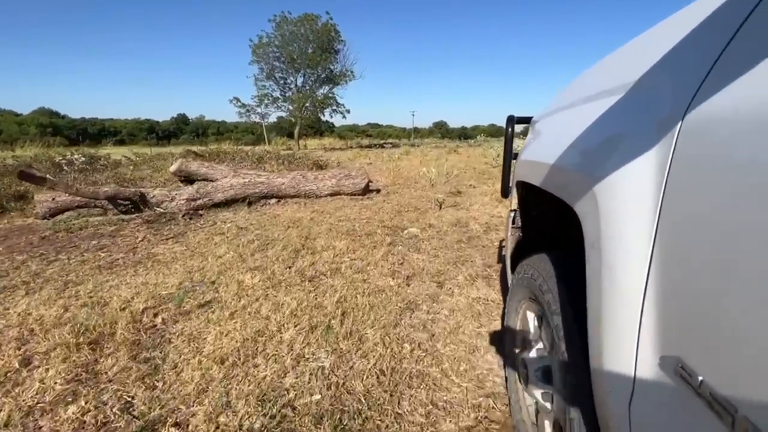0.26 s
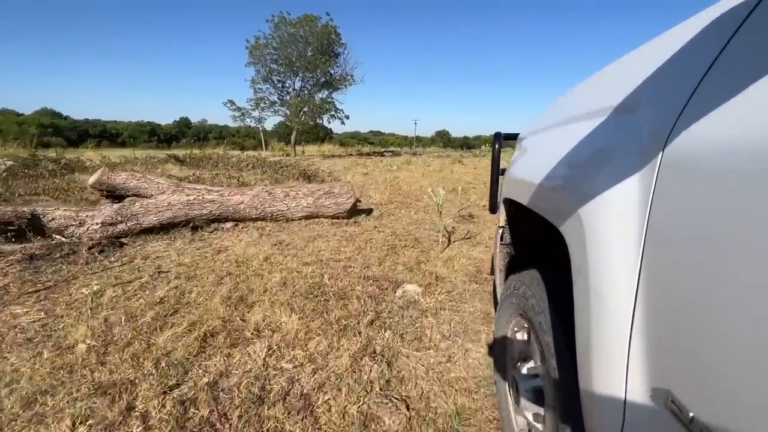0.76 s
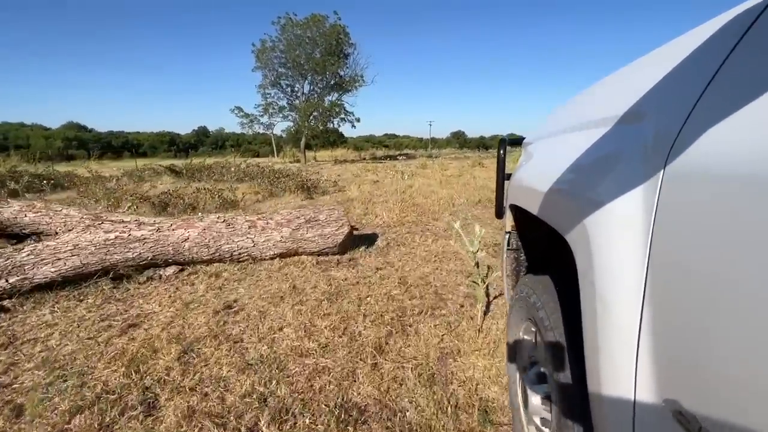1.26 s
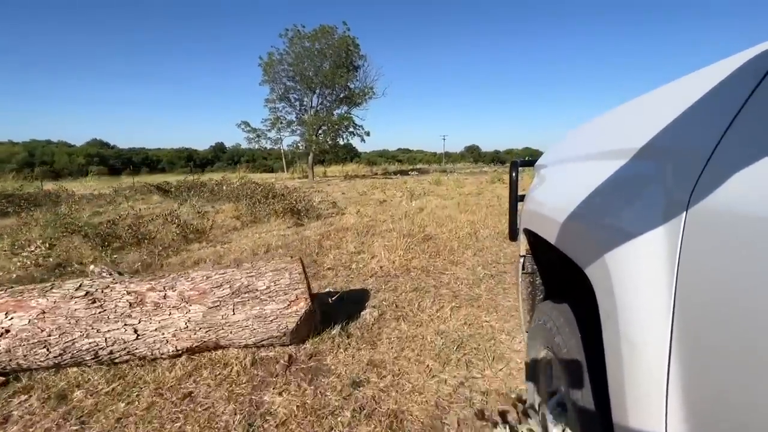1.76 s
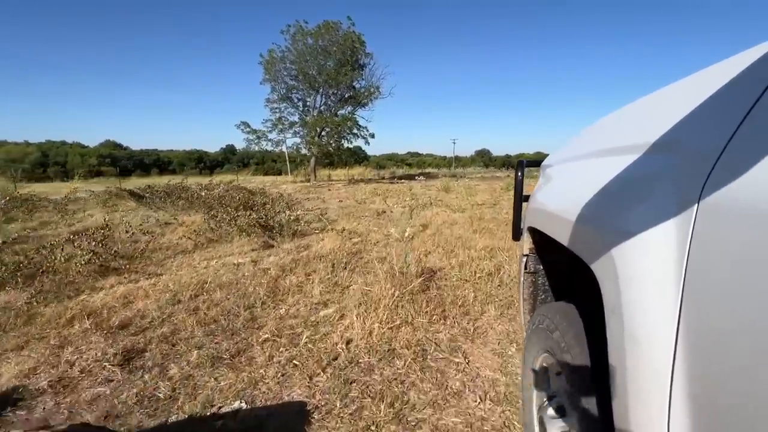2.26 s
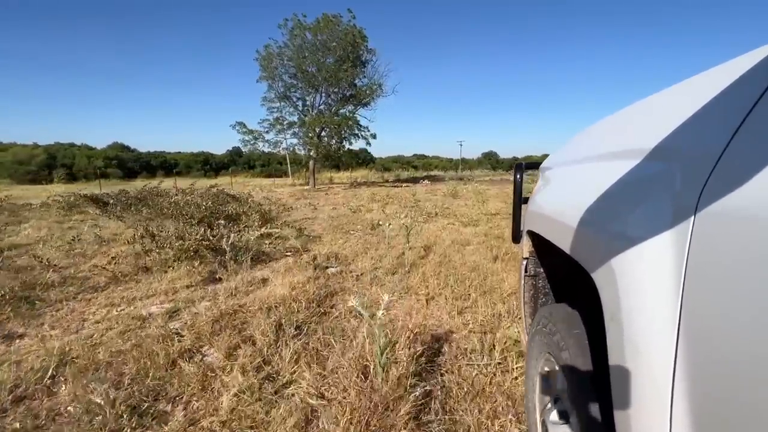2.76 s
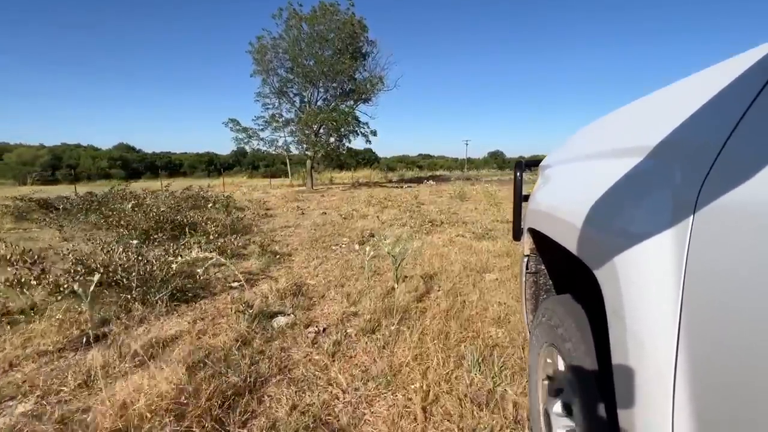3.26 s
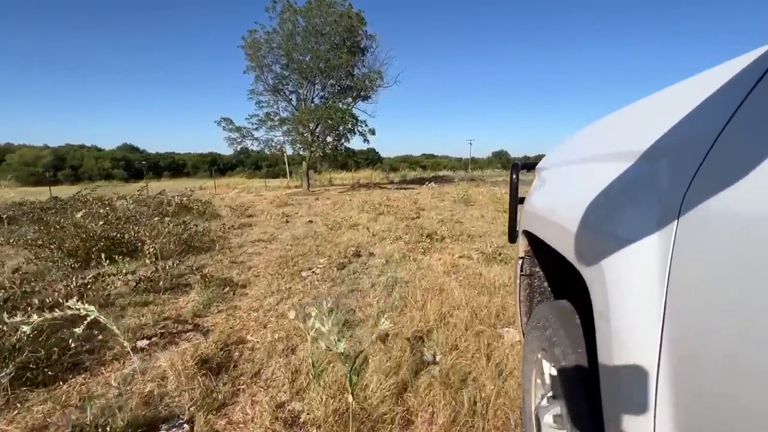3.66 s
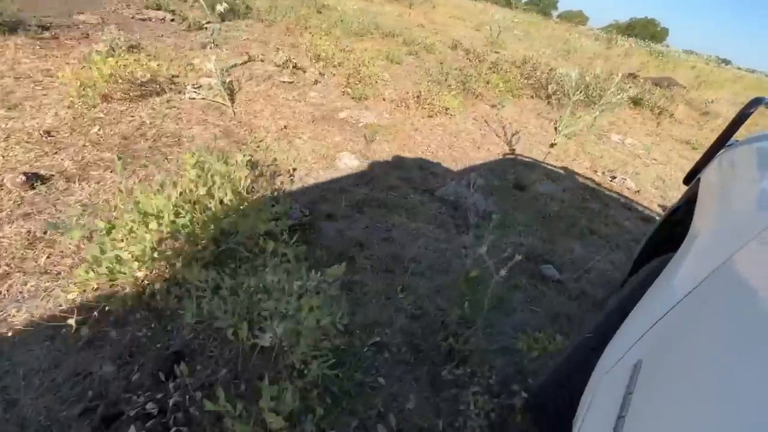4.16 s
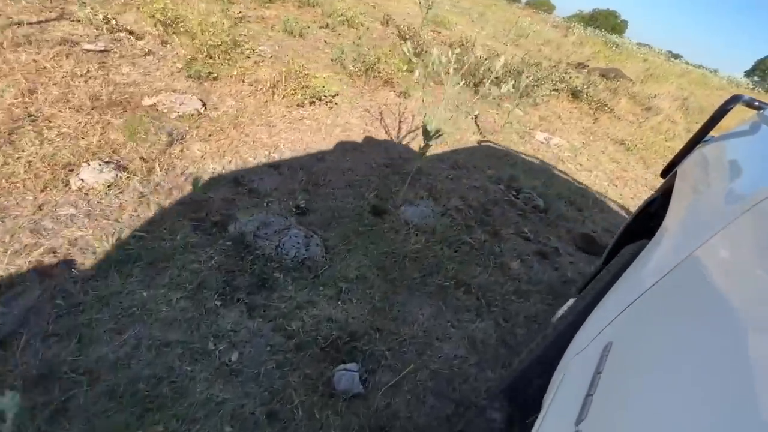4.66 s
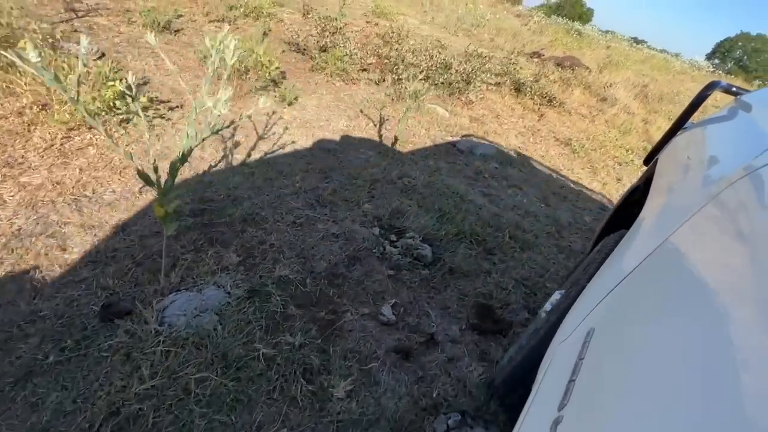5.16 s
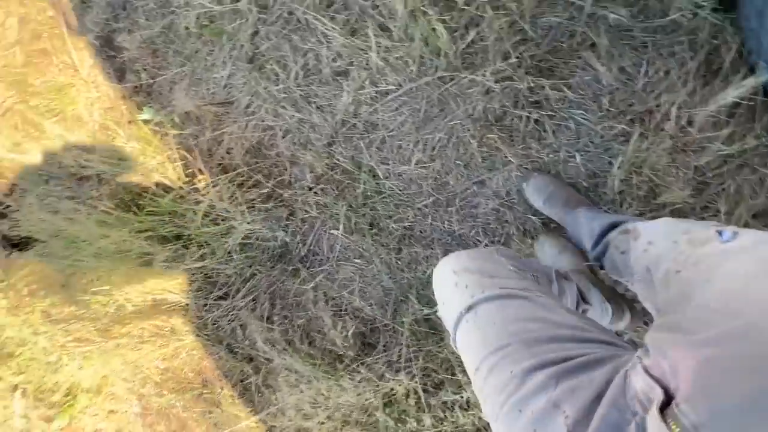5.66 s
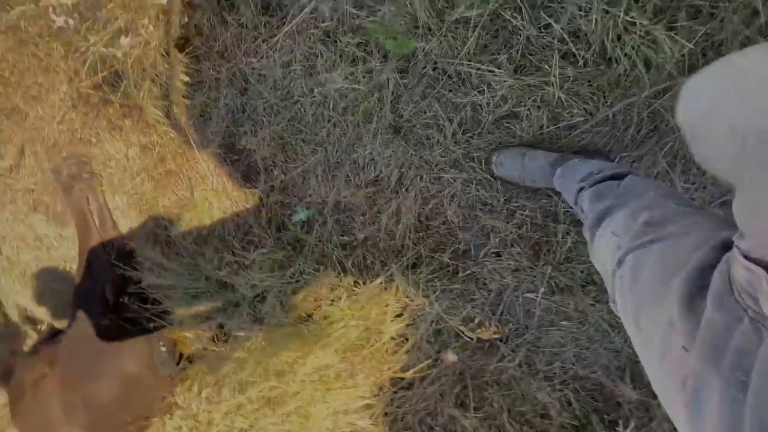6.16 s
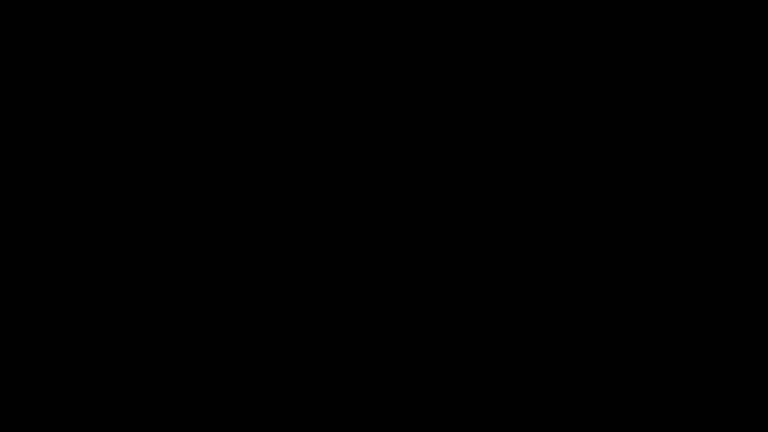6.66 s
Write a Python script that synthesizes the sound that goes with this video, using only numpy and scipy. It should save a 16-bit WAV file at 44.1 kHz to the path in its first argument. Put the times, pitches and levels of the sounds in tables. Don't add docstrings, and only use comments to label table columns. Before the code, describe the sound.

From the open window of a pickup rolling over dry pasture, a low eight-cylinder throb sits under a steady, coarse rush of grass crushed by tyres. Grasshoppers rattle in quick bright ticks during the first half second and again around 1.0-1.2. Stalks slap and pebbles ping the body at 1.6-1.9, with dull knocks at 2.0 and 2.2. The engine sags near 2.4; a stem scrapes raspily along sheet metal at 3.0-3.2 amid brittle hiss. The engine pulls up strongly at 3.7-4.3, with a low knock and whip at 3.85, then slows, lugging in soft booms from 4.9 to 5.3. At 5.4 the sound cuts abruptly to a much quieter place: boots swish in grass and thud softly, twigs snap at 5.65, 5.8 and 6.4-6.8, insects tick, and a distant engine idles faintly. Everything fades from about 6.4 to silence by 6.9.

```python
import sys
import numpy as np
from scipy import signal
from scipy.fft import rfft, irfft, next_fast_len
from scipy.io import wavfile
from scipy.ndimage import uniform_filter1d

SR = 44100
rng = np.random.default_rng(int(sys.argv[2]) if len(sys.argv) > 2 else 0)


def output_pcm(signal):
    pcm = np.clip(np.atleast_2d(signal).T, -1, 1) * 32767
    wavfile.write(sys.argv[1], SR, np.round(pcm).astype(np.int16))


def level_to_linear(level):
    exponent = np.asarray(level, float) / 20
    return 10 ** exponent


N = 304731
CUT_S, CUT_LENGTH_S = 5.397, 0.008
FADE_END_S, FADE_S = 6.935, 0.55


def in_time(rows):
    s, *columns = np.transpose(rows)
    return np.array([np.interp(np.arange(N) / SR, s, c) for c in columns])


def at_hz(table, column, hz):
    return np.interp(np.log(hz + 1), np.log(np.array(table)[:, 0]), np.array(table)[:, column])


def rms_one(x):
    return x / np.sqrt(np.mean(x ** 2) + 1e-20)


def drift(rate_hz):
    r = np.exp(-80 * np.pi * rate_hz / SR)
    slow = signal.lfilter([1], [1, -2 * r, r * r], rng.standard_normal(N // 40 + 2002))[2000:]
    return np.interp(np.arange(N) / 40, np.arange(len(slow)), rms_one(slow))


def ring(x, hz, width_hz):
    r = np.exp(-np.pi * width_hz / SR)
    top_one = np.array([1, 0, -1]) * (1 - r * r) / 2
    return signal.lfilter(top_one, [1, -2 * r * np.cos(2 * np.pi * hz / SR), r * r], x + 1e-18)


def add(out, s, piece):
    i = round(s * SR)
    out[..., i:i + piece.shape[-1]] += piece[..., :N - i]


def struck(rows, attack_s):
    out, t = np.zeros(N), np.arange(SR // 4) / SR
    for s, db, hz, t60 in rows:
        rise = np.minimum(t / min(attack_s, t60 / 10), 1)
        add(out, s, level_to_linear(db - 60 * t / t60) * rise * np.sin(2 * np.pi * hz * t))
    return out


# pitch_hz, width_hz, left_db, right_db
CASE_HOLLOWS = [(7590, 250, -13.5, -11.5), (5350, 91, -9.5, -14), (5780, 520, 2, -4.5),
                (8370, 520, 8.5, -3.5), (9230, 1060, -3, 3.5)]
# from_hz, to_hz, sign (-1 opposite, 1 same)
LOCKED_RANGES = [(10530, 11234, -1), (12340, 14860, 0.94)]
TOP_HZ, TOP_LEAD_S, TOP_LIKENESS = 10130, 0.0001873, 0.78


def pair(x, field):
    size = next_fast_len(N + 4096)
    hz, (one, other) = np.arange(size // 2 + 1) * SR / size, rfft(x, size)
    top = hz > TOP_HZ
    alike = np.clip(np.where(top, TOP_LIKENESS, at_hz(field, 3, hz)), 0, 1)
    lead = np.where(top, np.pi + 2 * np.pi * hz * TOP_LEAD_S, at_hz(field, 4, hz))
    tilt_db = at_hz(field, 2, hz) * ~top / 2 * [[1], [-1]]
    for centre_hz, width_hz, *gain_db in CASE_HOLLOWS:
        tilt_db += np.outer(gain_db, np.exp(-((hz - centre_hz) / width_hz) ** 2))
    left_gain, right_gain = level_to_linear(tilt_db)
    right = right_gain * (alike * np.exp(1j * lead) * one + np.sqrt(1 - alike ** 2) * other)
    for low_hz, high_hz, sign in LOCKED_RANGES:
        right = np.where((hz > low_hz) & (hz < high_hz), sign * left_gain * one, right)
    return irfft([left_gain * one, right], size)[:, :N]


# start_s, end_s, wing_beat_s, level_db
FLIGHTS = [(.0932, .173, .0192, -41), (.2086, .33, .0192, -37), (.3435, .403, .0192, -35),
           (.4578, .479, .0192, -34), (.9908, 1.03, .0185, -44), (1.116, 1.225, .0178, -39),
           (4.9463, 5.02, .0222, -35), (5.0745, 5.1, .02, -37), (5.1574, 5.18, .0209, -35),
           (6.0182, 6.06, .02, -47), (6.3954, 6.46, .0193, -37), (6.5899, 6.72, .0205, -43),
           (6.7535, 6.79, .0215, -37), (6.7965, 6.83, .0212, -31), (6.8392, 6.85, .02, -29),
           (6.8605, 6.908, .0217, -37)]
# start_s, level_db
SNAPS = [(.497, -43.5), (.575, -43), (0.6255, -39), (.864, -38), (.884, -40), (1.7072, -32.5),
         (1.7724, -24), (1.8772, -31), (1.8825, -31), (2.214, -37), (2.7843, -39), (2.8446, -43),
         (2.886, -37), (2.9494, -47), (2.9813, -28), (3.0636, -30), (3.127, -33), (3.1804, -25),
         (3.2563, -32), (3.3704, -34), (3.3904, -29), (3.5195, -45), (3.8468, -31.5), (3.9586, -36),
         (4.002, -46.5), (4.1438, -34), (4.2401, -40), (4.3068, -34), (4.7977, -45), (6.0195, -45),
         (6.061, -46), (6.1372, -45), (6.3365, -47), (6.358, -43), (6.375, -43), (6.4148, -34),
         (4.973, -37)]
FLIGHT_ENDS_DB, WING_SCATTER_DB = -1.5, 1


def hoppers():
    snaps = list(SNAPS)
    for start, end, beat, db in FLIGHTS:
        for s in np.arange(start, end, beat):
            from_middle = 2 * (s - start) / (end - start) - 1
            scatter_db = WING_SCATTER_DB * rng.standard_normal()
            snaps.append((s, db + FLIGHT_ENDS_DB * from_middle ** 2 + scatter_db))
    clicks, t = np.zeros(N), np.arange(SR // 200) / SR
    for s, db in snaps:
        add(clicks, s, level_to_linear(db - 0.5) * rng.choice([-1, 1], len(t)) * np.exp(-t / 0.0015))
    return ring(clicks, 13100, 5400) + level_to_linear(-25.0) * ring(clicks, 6000, 3000)


RISE_SHARE, HOLD = 0.45, 1.47


def rustle(events, width_octaves, hz):
    t = np.arange(0, N + 64, 64) / SR
    s, length, db, centre_hz = np.transpose(events)[..., None]
    late = (t - s) / length
    in_time_power = np.where(late > 0, late, -late / RISE_SHARE) ** HOLD
    shape = np.exp(-in_time_power - (np.log2(hz / centre_hz) / width_octaves) ** 2)
    return np.interp(np.arange(N) / SR, t, np.sqrt(1 + np.sum(level_to_linear(2 * db) * shape, axis=0)))


SPEED_HZ, SPEED_FROM_HZ = 1500, 920
DRY_FROM_HZ, DRY_SHARE_PER_OCTAVE = 2770, 0.27


def grass(field, events, speed_db, dry_db, bed_db, bed_db_per_octave, width_octaves, patchy_db,
          grains_per_s, grain_db):
    size = next_fast_len(N)
    colour = level_to_linear(at_hz(field, 1, np.arange(size // 2 + 1) * SR / size)) * np.sqrt(SR / 2)
    white = rng.standard_normal((2, 2, N))
    stems_break = rng.random(N) < grains_per_s * level_to_linear(5 * drift(8)) / SR
    sizes = level_to_linear(2.8 * np.minimum(rng.exponential(1, N), 3.0)) * stems_break
    crackle = rms_one(signal.lfilter([1], [1, -0.95], sizes))
    smooth, grainy = irfft(rfft([white, white * crackle], size) * colour, size)[..., :N]
    out, together = 0, drift(6)
    edges = 24 * 2 ** np.arange(0, 9.6, 0.5)
    for k, (low, high) in enumerate(zip(edges, edges[1:])):
        hz = np.sqrt(low * high)
        level_db = bed_db + bed_db_per_octave * max(np.log2(hz / 600), 0)
        level_db = level_db + speed_db * min(hz / SPEED_FROM_HZ, 1) / (1 + hz / SPEED_HZ)
        level_db = level_db + dry_db * DRY_SHARE_PER_OCTAVE * max(np.log2(hz / DRY_FROM_HZ), 0)
        level_db = level_db + patchy_db * (0.26 * together + 0.83 * drift(20.0))
        share = level_to_linear(grain_db) * np.clip(low / 8000, 0.1, 1)
        mix = (smooth[k % 2] + share * grainy[k % 2]) / np.sqrt(1 + share ** 2)
        band = signal.sosfilt(signal.butter(2, [low, high], "band", fs=SR, output="sos"), mix)
        out = out + band * rustle(events, width_octaves, hz) * level_to_linear(level_db)
    return out


# pitch_hz, level_db (per Hz), left_over_right_db,
# likeness (0 to 1), right_lead_rad
FIELD_WALKING = [(30, -67, -3, 0.38, -3), (110, -80.5, 0, 0.91, 1.5), (217, -92.5, 1, 0.69, 1.15),
                 (456, -93, -1, 0.95, 1.5), (900, -95, 1, 0.5, 4.5), (1370, -96.5, 3, 0.15, 5.5),
                 (1750, -87.5, 10.5, 0.35, -2), (2600, -100, 3, 0.21, 0.5), (3580, -100.0, -2, 0.19, 0.5),
                 (5000, -99, 4, 0.34, 1), (6540, -98.5, -0.5, 0.3, 2), (8600, -99.5, -9.5, 0.31, 3),
                 (9700, -96, 1, 0.13, 2.5), (15000, -100, -2, 0.44, -8)]
# peak_s, length_s (of the fall), level_db (over the bed), pitch_hz
STEPS = [(5.402, 0.018, 15, 600), (5.49, 0.041, 10, 500), (5.508, 0.034, 2, 4300), (5.65, 0.0093, 12, 700),
         (5.658, 0.12, 0, 12700), (5.777, 0.064, -4, 1750), (5.845, 0.07, 13, 5000),
         (5.852, 0.032, 10, 13100), (5.902, 0.018, 16.5, 7000), (5.868, 0.35, 12.5, 606),
         (6.015, 0.03, 9, 1750), (6.06, .04, 9, 1750), (6.11, .03, 9, 1750), (6.056, 0.09, 12, 800),
         (5.973, 0.042, 6.5, 7950), (6.172, 0.031, -3, 4300), (6.159, 0.036, 2, 200),
         (6.283, 0.047, -14, 1750), (6.45, 0.05, 13, 596), (6.472, 0.067, 9, 8800), (6.54, 0.015, 5, 1750),
         (6.612, 0.014, 12, 4040), (6.606, 0.025, 17, 496), (6.66, 0.014, 14, 350),
         (6.75, 0.037, 13.5, 592)]


def boots_in_grass():
    return grass(FIELD_WALKING, STEPS, speed_db=0, dry_db=0, bed_db=-6.5, bed_db_per_octave=0.5,
                 width_octaves=1.06, patchy_db=2.2, grains_per_s=500, grain_db=-8.5)


# start_s, level_db, final_pitch_hz
TWIGS = [
    (5.643, -40, 615),
    (5.79, -31, 503),
    (6.415, -46, 600),
    (6.479, -40, 604),
    (6.612, -37.5, 497),
    (6.721, -49, 900),
    (6.769, -43, 543),
]


def twigs():
    out, t = np.zeros(N), np.arange(SR // 40) / SR
    for s, db, hz in TWIGS:
        turns = hz * (t + 1.37 * 0.0013 * (1 - np.exp(-t / 0.00055)))
        splinter = 5.6 * ring(rng.standard_normal(len(t)), 1200, 900)
        swell = (t / 0.0033) * np.exp(1 - t / 0.0016)
        add(out, s, level_to_linear(db) * (np.sin(2 * np.pi * turns) + 0.21 * splinter) * swell)
    return signal.sosfilt(signal.butter(4, 2100, fs=SR, output="sos"), out)


# start_s, level_db, pitch_hz, die_away_s (to -60 dB)
THUDS = [(5.402, -34, 298, .03), (5.447, -37, 190, 0.032), (5.642, -50, 1750, 0.022), (6.6, -52, 306, 0.03),
         (5.645, -50, 350, 0.02), (5.79, -46, 300, 0.019), (6.62, -45, 350, .025), (6.662, -46, 380, .025),
         (5.80, -49, 110, .1), (5.91, -45, 130, 0.063), (6.05, -54, 60, .15), (6.12, -48, 130, 0.15),
         (6.46, -66, 199, 0.068), (6.62, -54, 99.3, 0.11)]


def boot_thuds():
    return struck(THUDS, attack_s=0.0057)


# pitch_hz, level_db (per Hz), left_over_right_db,
# likeness (0 to 1), right_lead_rad
FIELD_ROLLING = [(30, -53.5, -1, 0.3, -0.6), (110, -53, 1.5, 0.7, 0.7), (192, -62, 0, 0.87, 0.6),
                 (423, -63, -2, 0.78, 1.34), (700, -70.5, -10.5, 0.79, 1.2), (1014, -68, -2.5, 0.88, 1.19),
                 (1663, -73, 1.7, 0.07, -2.5), (2510, -82.5, -3, 0.36, 1.5), (3900, -85.5, 3.5, 0.5, 1),
                 (4710, -89.5, 5, 0.5, 8.5), (5340, -85, 8, 0.3, -9.5), (8000, -89.5, -1.5, 0.5, -19.5),
                 (9200, -87.5, 2, 0.34, -5.5), (15100, -91.5, 9, 0.42, -6)]
# peak_s, length_s (of the fall), level_db (over the bed), pitch_hz
TUFTS = [(0.002, 0.0051, -4, 1500), (1.197, 0.11, 0, 13000), (1.511, 0.023, 1.5, 790),
         (1.62, 0.014, 2, 1000), (1.623, 0.12, -5.5, 13000), (1.78, 0.012, 9, 11000),
         (1.81, 0.11, 0.5, 5000), (2.995, 0.025, 5, 2200), (2.74, 0.042, -2, 13010),
         (2.943, 0.37, 8.5, 14600), (2.97, 0.056, 6, 4000), (3.3, 0.58, -13, 13200),
         (3.442, 0.022, 2, 4500), (3.627, 0.063, 2, 5000), (3.835, 0.013, -2, 801), (3.85, 0.029, -1, 4120),
         (3.895, 0.039, -1.5, 4550), (3.93, 0.052, -0.5, 5000), (3.936, 0.12, 7.5, 12000),
         (4.139, 0.028, 2, 11940), (4.286, 0.0083, 2.5, 4298), (4.301, 0.076, -4, 9000),
         (4.624, 0.055, 2, 13000), (4.801, 0.015, 4, 700), (4.833, 0.034, 5.5, 4360),
         (5.07, 0.04, -5, 7000), (5.388, 0.046, 2, 600), (5.39, 0.028, 9, 13000)]
# time_s, level_db
SPEED = [
    (0, 1.6),
    (1.6, 3.5),
    (2.9, 0),
    (4.6, -2),
    (5.4, -7.5),
]
# time_s, level_db
DRYNESS = [(0.0, -57.5), (0.87, -60), (1.2, -58), (2.7, -59.5), (3.01, -56), (3.42, -57.5), (4.06, -57),
           (4.38, -63), (5.18, -60.5), (5.38, -62.5)]


def tyres_in_grass():
    dry_db = in_time(DRYNESS)[0]
    dry_db = dry_db - np.mean(dry_db[np.arange(N) / SR < CUT_S])
    return grass(FIELD_ROLLING, TUFTS, in_time(SPEED)[0], dry_db, bed_db=-0.69, bed_db_per_octave=-0.91,
                 width_octaves=1.35, patchy_db=1.37, grains_per_s=400, grain_db=-10.5)


# start_s, level_db, pitch_hz, die_away_s (to -60 dB)
STALKS = [(1.6045, -28, 2500, 0.025), (1.7705, -29, 4500, 0.03), (1.778, -32, 3460, 0.081),
          (1.7815, -34.5, 9000, .08), (1.8794, -29, 2500, 0.033), (2.2147, -33, 4830, 0.046),
          (2.886, -38, 8600, 0.036), (2.9811, -30, 4330, 0.043), (3.0626, -42.5, 3340, 0.035),
          (3.38, -42, 8820, 0.042), (3.4594, -48, 5780, 0.04), (3.846, -25, 3000, 0.03),
          (3.851, -32, 4400, 0.15), (3.866, -35, 3700, 0.15), (3.937, -30, 8570, 0.1),
          (4.1435, -30, 3422, 0.04), (4.2867, -28, 3300, 0.015), (4.357, -33, 2000, 0.028),
          (4.365, -35, 5500, 0.022), (4.7994, -34, 5000, 0.05), (4.8183, -32.5, 5823, 0.046),
          (4.9592, -32.5, 2650, 0.035), (5.3838, -27.5, 2840, 0.021)]


def stalks():
    out, t = np.zeros((2, N)), np.arange(SR // 8) / SR
    for s, db, hz, t60 in STALKS:
        noise = rms_one(ring(rng.standard_normal((2, len(t))), hz, 0.63 * hz))
        add(out, s, level_to_linear(db - 9.5 - 60 * t / max(t60, 0.005)) * np.minimum(t / 0.00033, 1) * noise)
    return out


# time_s, level_db
SCRAPE = [
    (2.94, -59),
    (2.982, -42),
    (3.006, -35.5),
    (3.02, -39),
    (3.045, -34),
    (3.07, -42),
    (3.108, -38),
    (3.125, -44),
    (3.26, -60),
]
# pitch_hz, level_db, die_away_s (to -60 dB)
PANEL = [(820, -1, 0.025), (997, -1, .03), (1136, -1, 0.027), (1327, 4.5, 0.021), (1420, 9.5, 0.13),
         (1624, -1.5, 0.04), (1820, -7.5, .025), (2074, -7, 0.025)]
PANEL_DAMPING = 3.0


def scrape():
    level_db = in_time(SCRAPE)[0]
    slips = level_to_linear(3.0 * np.minimum(rng.exponential(1, N), 3.0)) * (rng.random(N) < 1600 / SR) * (level_db > -59)
    slide = np.clip((np.arange(N) / SR - 3.015) / 0.025, -1, 1)
    rings = np.zeros((2, N))
    for hz, db, t60 in PANEL:
        gain = level_to_linear(db + 4.7 * slide * np.clip(np.log2(hz / 1200), -0.6, 0.25))
        rings += gain * ring(slips * rng.standard_normal((2, N)), hz, PANEL_DAMPING / t60)
    return level_to_linear(level_db - 8.5) * rms_one(rings)


# start_s, level_db, pitch_hz,
# die_away_s (to -60 dB)
PINGS = [(1.607, -28, 488, 0.12), (1.605, -27, 1420, 0.013), (1.605, -36, 3150, 0.018),
         (1.606, -33, 2200, 0.017), (1.607, -45, 5570, .02), (1.84, -34, 1790, 0.068),
         (3.455, -37, 3800, 0.014), (2.03, -23, 229, 0.059), (2.2, -28.5, 264, 0.08),
         (3.835, -23, 100, 0.2), (3.85, -38, 1701, 0.08), (3.852, -44, 4450, .06), (3.87, -44, 3720, 0.087),
         (3.937, -38, 9000, .02), (3.96, -40, 9200, .02), (1.826, -48, 5560, 0.044),
         (4.692, -43, 5608, .015), (4.765, -37.5, 1580, 0.075), (4.815, -39, 1970, 0.033),
         (5.272, -31.5, 1439, 0.028), (5.385, -41, 2370, 0.043)]


def pings():
    return struck(PINGS, attack_s=0.00086)


CYLINDERS_DB = [-0.5, 5.5, 4.5, 1, -0.5, 3.5, -0.5, -2.5]
# pitch_hz, width_hz, level_db
EXHAUST = [(79, 28, -0.5), (155.2, 15.7, 6)]
BEAT_UNDER_DB, BEAT_FOLLOWS = -9, 0.15
BANKS_UNDER_DB, OVERRUN_DB, OVERRUN_HZ_PER_S = -26.5, 15, 7.2
LEAN_S, LEAN_BEAT_DB, LEAN_BANKS_DB = 4.5, 2, 8.5
OCTAVE_RAD = 5.0


def exhaust(x):
    return sum(level_to_linear(db) * ring(ring(x, hz, width), hz, 2 * width) for hz, width, db in EXHAUST)


def engine(table, rough_db, wander_rad, uneven_db):
    hz, tone_db, sharp_db = in_time(table)
    octave_db, mean_db = tone_db + sharp_db, np.mean(np.array(table)[:, 2]) + 3
    near = np.arange(N) > LEAN_S * SR
    beat_db = mean_db + uneven_db + LEAN_BEAT_DB * near + BEAT_UNDER_DB + BEAT_FOLLOWS * (tone_db - mean_db)
    slowing = np.clip(uniform_filter1d(-np.gradient(hz) * SR, size=SR // 20), 0, None)
    banks_db = mean_db + uneven_db + LEAN_BANKS_DB * near + BANKS_UNDER_DB
    banks_db = banks_db + OVERRUN_DB * np.tanh(slowing / OVERRUN_HZ_PER_S)

    turns = np.cumsum(hz) / SR
    angle = 2 * np.pi * turns + wander_rad * drift(2.0)
    tones = level_to_linear(tone_db) * np.cos(angle) + level_to_linear(octave_db) * np.cos(2 * angle + OCTAVE_RAD)
    tones += level_to_linear(octave_db - 27.5) * np.cos(3 * angle)

    fired = np.flatnonzero(np.diff(np.floor(turns)))
    strength = level_to_linear(np.resize(CYLINDERS_DB, len(fired)) + rough_db * rng.standard_normal(len(fired)))
    pulses = np.zeros(N)
    pulses[fired] = strength - strength.mean()
    banks = level_to_linear(banks_db + 0.5) * (np.cos(3 / 2 * angle) + level_to_linear(-7.5) * np.cos(5 / 2 * angle))
    return np.sqrt(2) * (tones + exhaust(banks)) + level_to_linear(beat_db) * rms_one(exhaust(pulses))


# time_s, firing_hz, load_db (of the firing tone),
# sharpness_db (octave over tone)
IDLING = [
    (5.45, 74.8, -63, -25),
    (5.56, 74.6, -57.5, -32),
    (6.02, 76.2, -62, -30),
    (6.07, 74.1, -56.5, -36),
    (6.91, 77, -61, -30),
]


def idling_engine():
    return engine(IDLING, rough_db=4.0, wander_rad=0.05, uneven_db=-13.5) * level_to_linear([[0.7], [-0.7]])


# time_s, firing_hz, load_db (of the firing tone), sharpness_db (octave over tone)
DRIVE = [(0, 85.3, -30.5, -4.5), (.52, 82.9, -29, -27), (1.2, 86.05, -27.5, -7.5), (2.09, 82.8, -27.5, -16),
         (2.25, 78.3, -26.5, -9), (2.4, 70.5, -38, -4), (2.58, 72.07, -34.5, -5), (3.3, 67.72, -46, 6),
         (3.57, 72.5, -34, -5), (3.62, 76, -28.5, -5), (3.7, 79, -28, -5), (3.745, 80.5, -22.5, -3),
         (3.82, 80.5, -23.5, -9.5), (3.92, 78.5, -27, -3), (4.18, 81.5, -22, -2), (4.3, 80, -23, -3),
         (4.34, 79, -28, -2), (4.562, 72.8, -33, -1.5), (4.92, 69.4, -33.5, -4.5), (5.4, 64.3, -51, 8)]
# start_s, level_db, pitch_hz, die_away_s
CHUGS = [
    (4.915, -27, 164.7, 0.21),
    (5.045, -24.5, 164, 0.29),
    (5.165, -23.5, 162.8, 0.31),
    (5.29, -30, 165.7, 0.33),
    (5.13, -22, 90, .3),
    (5.27, -30, 88, 0.57),
]
# time_s, lag_s
ENGINE_LAG = [(0, -.0004), (2.3, -.0003), (3.4, 0), (3.7, .0005), (5.4, .0005)]


def driving_engine():
    t = np.arange(N) / SR
    motor = engine(DRIVE, rough_db=3.0, wander_rad=0.09, uneven_db=-0.64) + struck(CHUGS, attack_s=0.019)
    right = np.interp(t - in_time(ENGINE_LAG)[0], t, motor)
    return level_to_linear([[0.5], [-0.5]]) * [motor, right]


def scene():
    t = np.arange(N) / SR
    before = np.clip((CUT_S - t) / CUT_LENGTH_S + 0.5, 0, 1)
    fade = np.clip((FADE_END_S - t) / FADE_S, 0, 1)
    insects = hoppers()
    walking = boots_in_grass() + insects + twigs() + boot_thuds()
    rolling = tyres_in_grass() + stalks() + scrape() + insects + pings()
    first = pair(rolling, FIELD_ROLLING) + driving_engine()
    second = pair(walking, FIELD_WALKING) + idling_engine()
    return before * first + (1 - before) * fade * second


def band_limit(x):
    return signal.sosfilt(signal.butter(12, 16140, fs=SR, output="sos"), x)


def record(dry):
    bass_cut = signal.butter(3, 45, "high", fs=SR, output="sos")
    top_cut = signal.ellip(10, 0.3, 50, 15790, fs=SR, output="sos")
    mix = signal.sosfilt(np.vstack([bass_cut, top_cut]), dry)
    return band_limit(mix)


dry = scene()
out = record(dry)
output_pcm(out)
```